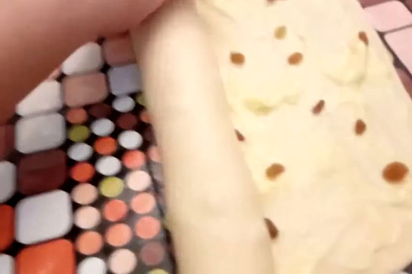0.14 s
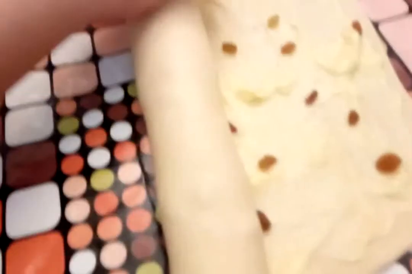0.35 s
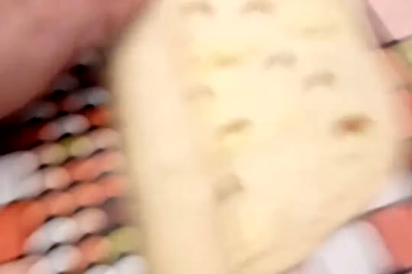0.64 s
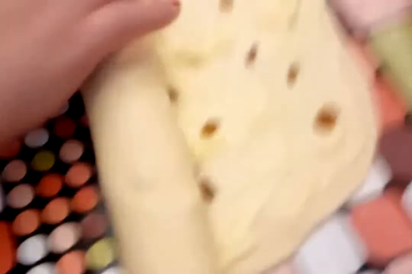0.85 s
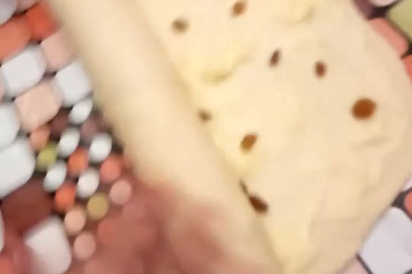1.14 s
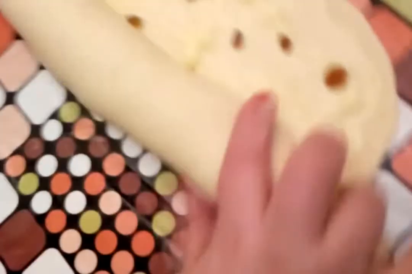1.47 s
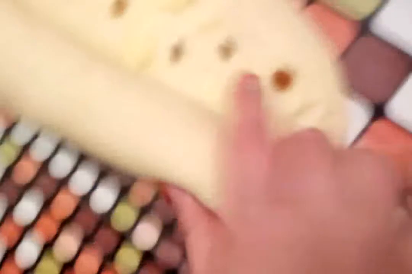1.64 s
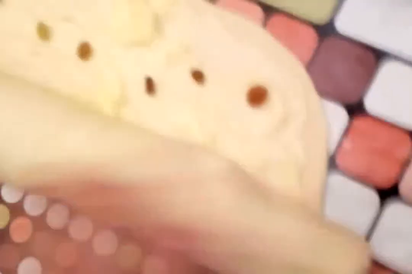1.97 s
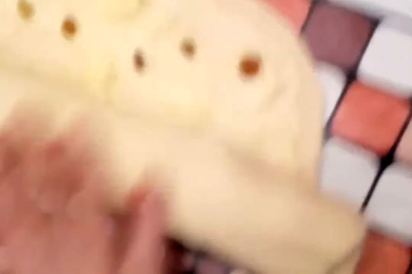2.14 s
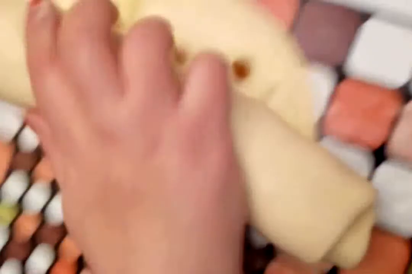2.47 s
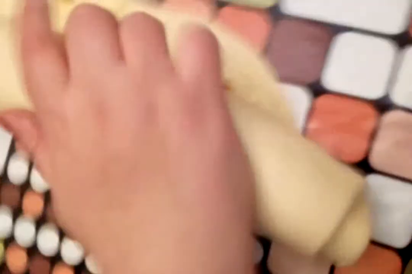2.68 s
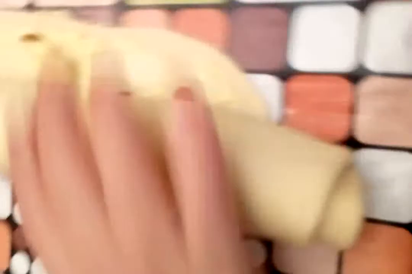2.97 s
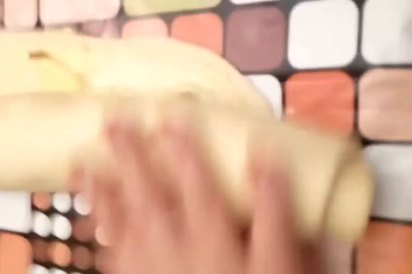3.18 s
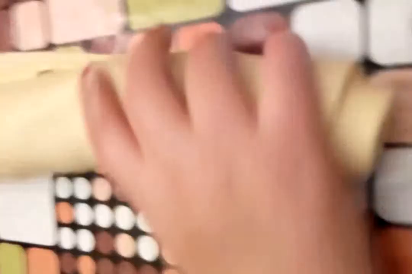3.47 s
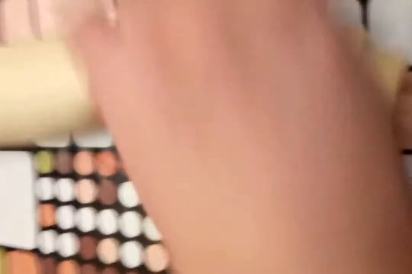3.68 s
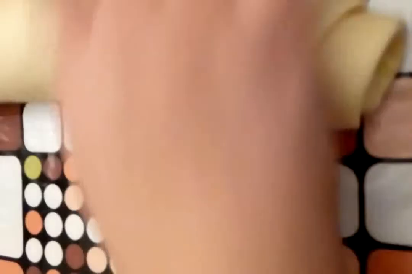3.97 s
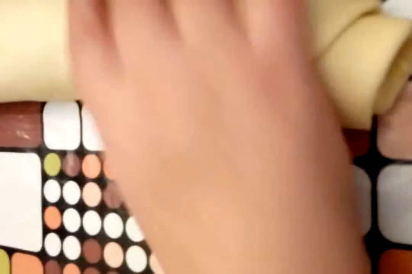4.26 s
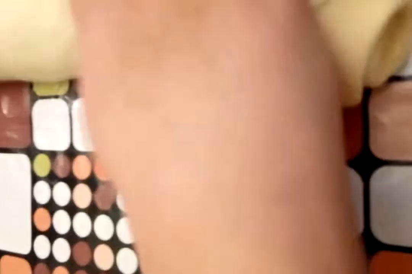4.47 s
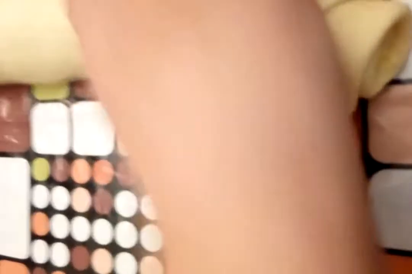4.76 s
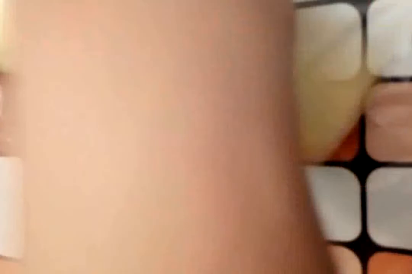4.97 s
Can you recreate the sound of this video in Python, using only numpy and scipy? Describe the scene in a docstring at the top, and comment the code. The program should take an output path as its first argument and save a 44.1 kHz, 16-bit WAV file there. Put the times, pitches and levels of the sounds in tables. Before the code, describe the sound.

Very close, dry handling of soft dough on a plastic tablecloth in a quiet kitchen. Faint thin skin hisses come first, then from about one second a run of quick firm strokes with crackly peeling, low rasps, sharp ticks and small pops. After three seconds it thins to light palm rubs, faint clicks and two tiny clinks. Centred sound, hardly any echo.

```python
"""A narrow hiss of skin on soft dough, close to the microphone, over the hush of a quiet kitchen.
Hands roll a sheet of dough into a log on a plastic tablecloth: filtered noise and grains make the hiss,
the fine crackle of dough peeling off the cloth, the rasp of squeezing, the palm's rub and the low rumble.
Tacky spots let go with ticks (snap and short ring), pats and air pockets pop (brief sine bursts),
jolts make tableware clink (decaying sines), and faint stray clicks come in later."""
import sys
import numpy as np
from scipy import signal
from scipy.io import wavfile
from scipy.ndimage import uniform_filter1d

SR = 44100
rng = np.random.default_rng(int(sys.argv[2]) if len(sys.argv) > 2 else 0)


def persist_wave(psi):
    """Save psi, clipped to +-1, as 16-bit WAV."""
    counts = np.round(np.clip(psi, -1, 1) * 32767).astype(np.int16)
    wavfile.write(sys.argv[1], SR, np.atleast_2d(counts).T)


N = 225741
TIME = np.arange(N) / SR  # s
FFT_SIZE, HOP = 512, 128  # samples
BINS = np.fft.rfftfreq(FFT_SIZE, 1 / SR)[:, None]  # Hz
FRAMES = np.arange(-(-N // HOP) + 1) * HOP / SR  # s

# In all gesture tables level_db and swell_db are relative: each sound's own trim comes on top.
# Light glides of skin over the dough; a fingertip almost whistles, a flat hand hisses broadly:
# start_s, length_s, level_db, swell_db, hiss_centre_hz, half_width_octaves
LIGHT_GLIDES = [(0,0.36,-73,2.5,4530,0.12),(.43,0.12,-63.5,-3.5,5300,1),(.83,0.082,-71,0,5900,0.46),(.925,0.086,-57.5,1,5200,.48),
                (1.05,0.64,-63.5,-4.5,4750,0.59),(1.935,0.058,-61.5,4.5,5550,0.094),(2.88,0.1,-59.5,-3,5500,0.44),(2.99,0.06,-60.5,0.5,4770,0.27),(3.08,0.16,-63.5,5.5,5300,0.5),
                (3.55,.16,-68,4.5,5080,0.29),(3.81,.03,-77,0,4780,.025),(4.16,0.065,-65.5,3,5350,0.24),(4.39,0.044,-69.5,10.5,5600,.25),(4.58,0.13,-55.5,-5.5,5430,.28),
                (4.83,0.016,-54.5,4.5,5700,0.45),(4.88,0.12,-66.5,3,6800,0.12)]
GLIDE_ATTACK_S, GLIDE_RELEASE_S = 0.066, 0.078  # every attack and release: time for 20 dB

# Firm strokes that roll the log and lift it off the cloth:
# start_s, length_s, level_db, swell_db, hiss_centre_hz, peel_rel_db, fine_crackle_rel_db
FIRM_STROKES = [(1.2,0.086,-57,0,5060,-5.5,-25),(1.42,0.039,-60.5,1,5500,-18,-7.5),(1.49,0.12,-44,-11.5,5200,-8.5,-17),(1.63,0.15,-64.5,4,5400,-1,-21),
                (1.78,0.061,-43,-2,4960,-10,-17),(1.86,0.039,-51,-4.5,4900,-4.5,-18.5),(2.02,0.11,-56.5,7.5,5000,-5.5,-23),(2.168,0.044,-47,-1,6100,-12.5,-12.5),
                (2.262,0.14,-48,-4.5,4870,-6.5,-22),(2.405,0.073,-48,-2.5,4730,-7.5,-14),(2.5,.11,-47,0,4850,-3.5,-16),
                (2.635,0.22,-45.5,-8,4470,-10,-31),(3.312,.125,-54,-2,5400,-7,-27.5)]


def amp(db):
    """Decibels to gain."""
    return 10 ** (np.asarray(db) / 20)


def unit(x):
    """Scales to rms 1."""
    return x / np.sqrt(np.mean(x ** 2) + 1e-20)


def add(mix, s, sound):
    """Mixes a sound in at time s."""
    part = mix[max(round(s * SR), 0):][:len(sound)]
    part += sound[:len(part)]


def impulse(points, size=4096):
    """Minimum-phase click whose spectrum follows the given colour."""
    hz, db = np.transpose(points)
    log_hz = np.log(abs(np.fft.fftfreq(size, 1 / SR)) + 1)
    log_gain = np.log(amp(np.interp(log_hz, np.log(hz), db)))
    spectrum = np.exp(np.conj(signal.hilbert(log_gain)))
    return np.fft.ifft(spectrum).real[:size // 2]


def colour(x, points):
    """Gives x a fixed colour, at rms 1."""
    return unit(signal.oaconvolve(x, impulse(points))[:N])


def slips(per_s, spread_db, smooth, clump_db, clump_hz):
    """Tiny stick-slip releases of random sign, in clumps, over a smooth noisy rub, at rms 1."""
    size = amp(spread_db * np.minimum(rng.exponential(1, N), 4))
    sign = rng.choice([-1, 1], N)
    grains = unit(size * sign * (rng.random(N) < per_s / SR))
    clumps = np.interp(TIME * clump_hz, np.arange(N), rng.standard_normal(N))
    rub = grains + smooth * rng.standard_normal(N)
    return unit(rub * amp(clump_db * clumps))


def gestures(rows, attack_s, release_s):
    """Each gesture rises, swells or sags, and dies away: gains, progress 0-1, further columns."""
    start, length, db, swell_db, *columns = np.transpose(rows)[:, :, None]
    progress = np.clip((FRAMES - start) / np.maximum(length, .001), 0, 1)
    before = np.maximum(start - FRAMES, 0) / attack_s
    after = np.maximum(FRAMES - start - length, 0) / release_s
    gains = amp(db + swell_db * progress - 20 * np.minimum(before + after, 10))
    return gains, progress, *columns


def together(gains, idle=0):
    """Joint gain of overlapping gestures and a steady idle level, sample by sample."""
    joint = np.sqrt(np.sum(gains ** 2, axis=0) + idle ** 2)
    return np.interp(TIME, FRAMES, joint)


def blend(gains, values):
    """A property of the contact, led by whichever gesture is loudest."""
    return np.sum(gains ** 2 * values, axis=0) / np.sum(gains ** 2, axis=0)


def sweep(x, gain, ripple_db):
    """Filters x by a moving gain; shifting fingers add drifting peaks and notches. Rms 1."""
    overlap = FFT_SIZE - HOP
    z = signal.stft(x, SR, nperseg=FFT_SIZE, noverlap=overlap)[2]
    ripple = uniform_filter1d(rng.standard_normal(z.shape), size=2, axis=0)  # across bins
    ripple = unit(uniform_filter1d(ripple, size=22, axis=1))  # across frames
    gain = gain * amp(ripple_db * ripple)
    gain = gain / np.sqrt(np.mean(gain ** 2, axis=0))
    return unit(signal.istft(z * gain, SR, nperseg=FFT_SIZE, noverlap=overlap)[1][:N])


def hiss(gains, hz, width_oct, top_hz=6900):
    """Skin ridges catch and slip, hissing in a narrow band, dulled at the top by the microphone."""
    half_width = np.maximum(blend(gains, width_oct), .02)
    away = np.log2((BINS + 1) / blend(gains, hz)) / half_width
    microphone_drop = np.sqrt(1 + (BINS / top_hz) ** 36)
    band = (1 + away ** 2) ** -1.5 / microphone_drop
    rub = slips(per_s=3000, spread_db=3.5, smooth=0.81, clump_db=2.05, clump_hz=170.4)
    return together(gains) * sweep(rub, band, ripple_db=4.0)


def sliding(trim_db=-1.5):
    """Skin hisses in light glides and, under a flat hand, in firm strokes."""
    light, _, light_hz, width_oct = gestures(LIGHT_GLIDES, GLIDE_ATTACK_S, GLIDE_RELEASE_S)
    firm, _, firm_hz, _, _ = gestures(FIRM_STROKES, attack_s=0.051, release_s=0.048)
    firm_width_oct = 0.55
    return amp(trim_db) * (hiss(light, light_hz, width_oct) + hiss(firm, firm_hz, firm_width_oct))


def kitchen_hush(level_db=-74):
    """Steady coloured noise of the quiet kitchen."""
    # Colour of the room's hush: freq_hz, relative_db
    hush_colour = [(15, -61), (25, -28), (71, -0.5), (140, -6), (523, -7), (762, -9.5), (826, -11),
                   (4260, -20), (5430, -21), (15500, -29)]
    return amp(level_db) * colour(rng.standard_normal(N), hush_colour)


def peeling(glide_fine_db=-27, idle_db=-86, trim_db=5.0):
    """Sticky threads break as dough leaves the cloth; strokes add finer crackle, glides only a trace."""
    # Colour of the peeling sheet: freq_hz, relative_db
    sheet_colour = [(200, -31), (550, -16), (1000, -13), (2000, -1.5), (3100, 0.5), (4200, 0), (5800, 3),
                    (6800, -31.5), (8000, -20), (16000, -48)]
    # Colour of the finer crackle: freq_hz, relative_db
    fine_colour = [(3000,-25.5),(5500,-16.5),(6700,13),(8200,8.5),(11000,6.5),(13000,5),(15000,0),(16000,-5)]
    # peeling starts more abruptly than the hiss and dies away about as fast
    firm, _, _, peel_db, fine_db = gestures(FIRM_STROKES, attack_s=0.027, release_s=0.047)
    light = gestures(LIGHT_GLIDES, GLIDE_ATTACK_S, GLIDE_RELEASE_S)[0]
    threads = slips(per_s=4000, spread_db=0.0, smooth=.9, clump_db=2.2, clump_hz=175)
    sheet_gain = together(firm * amp(peel_db), amp(idle_db))
    fine_gain = together(np.vstack([firm * amp(fine_db), light * amp(glide_fine_db)]))
    sheet = sheet_gain * colour(threads, sheet_colour)
    fine = fine_gain * colour(threads, fine_colour)
    crackle = amp(trim_db) * (sheet + fine)
    return np.std(crackle) * sweep(crackle, 1, ripple_db=3.0)  # sweep resets the level


def squeezing(top_hz=2200, fall_oct=0.74, idle_db=-82, trim_db=-1.1):
    """Coarser slips rasp in the gap under the fingers, whose pitch falls as the dough spreads."""
    # Dough squeezed along under the fingers: start_s, length_s, level_db, swell_db, open_gap_hz
    squeezes = [(1.2,0.1,-65.5,2.5,850),(1.42,0.12,-46.5,-11.5,930),(1.645,0.13,-51,5.5,1020),(2.03,0.14,-61,6,760),
                (2.255,0.1,-53.5,-0.5,844),(2.37,0.071,-51.5,10.5,790),(2.48,0.092,-57,-1.5,1010),(2.59,0.0067,-38.5,-1.5,1030),
                (2.63,0.321,-63,-6,1120),(3.14,0.015,-58,0.5,1270),(3.33,.1,-67.5,6.5,1000),(3.605,0.086,-73,2.5,1220)]
    gains, progress, open_hz = gestures(squeezes, attack_s=0.027, release_s=0.021)
    gap_hz = open_hz * 2 ** (-fall_oct * progress ** 2)  # sinks slowly at first
    ratio = BINS / blend(gains, gap_hz)
    resonance = abs(ratio ** 2 / (1 - ratio ** 2 + .95j * ratio)) ** 2
    gap = resonance / np.sqrt(1 + (BINS / top_hz) ** 9)
    rub = slips(per_s=1800, spread_db=0.5, smooth=0.58, clump_db=2.5, clump_hz=159)
    return together(gains, amp(idle_db)) * amp(trim_db) * sweep(rub, gap, ripple_db=1.0)


def rolling(idle_db=-82.5, trim_db=3.5):
    """The soft log's weight shifts and rumbles on the table, never quite at rest."""
    # Shifts of the log's weight: start_s, length_s, level_db, swell_db
    shifts = [(.4,0.044,-63,-7),(.92,0.1,-79,-2),(1.21,0.25,-68.5,-2.5),(1.48,0.033,-56.5,-6),(1.96,0.056,-81,9.5),(2.19,0.22,-66.5,-6.5),
              (3.31,0.038,-77,3.5),(3.65,0.033,-64,-7.5),(4.2,0.16,-80.5,1),(4.67,.19,-73,2.5),(5,0.033,-67,2.5)]
    # Colour of the table's rumble: freq_hz, relative_db
    table_colour = [(20, -16), (45, -10), (70, -11.5), (110, 4.5), (170, 0.5), (300, -3.5), (450, -7),
                    (800, -33.5), (2000, -39.5)]
    gains, _ = gestures(shifts, attack_s=0.047, release_s=0.086)
    bumps = slips(per_s=150, spread_db=3.5, smooth=1.2, clump_db=1.5, clump_hz=38.4)
    return together(gains, amp(idle_db)) * amp(trim_db) * colour(bumps, table_colour)


def ticks(swell_s=.00016, top_hz=7000):
    """Each release is a broad snap and a very short ring of the plastic."""
    # Tacky spots letting go: start_s, ring_peak_db, ring_hz, snap_peak_db
    releases = [(0.388,-49,1810,-70),(0.4161,-30,5360,-42.5),(1.1919,-40,6200,-30.5),(1.2802,-33.5,5200,-50),
                (1.3955,-60,5400,-47),(1.4331,-18.5,5430,-17.5),(1.4354,-21.5,4800,-33),(1.481,-20.5,5740,-41),(1.967,-41,5700,-67),
                (2.21,-34,4770,-27),(2.2253,-18.5,3870,-16),(2.2272,-23.5,5960,-28),
                (2.5566,-46,6000,-26),(2.597,-27,5350,-29),(2.6018,-28,5600,-36),(2.802,-40,5100,-41),
                (2.8405,-22.5,5940,-34.5),(2.8958,-33,4950,-39.5),(3.1386,-34.5,5600,-43.5),
                (3.4197,-38.5,5100,-59),(3.6054,-49,1330,-52),(3.627,-51,1240,-65),(3.756,-53.5,1770,-64),(3.795,-53.5,1330,-62),(4.2781,-46.5,5430,-53),(4.3762,-46.5,5530,-67),
                (4.566,-41,5600,-52),(4.6051,-33.5,5570,-64),(4.6237,-34,5500,-69),(4.657,-32,5750,-64),
                (4.695,-43,5340,-51),(4.799,-63,6300,-52)]
    # Colour of the broad snap: freq_hz, relative_db
    snap_colour = [(100,-45),(500,-23),(1000,4.5),(2500,1),(4000,3.5),(6000,-5),(7800,-5.5),(12000,-10.5),(16000,-11)]
    out, snap = np.zeros(N), impulse(snap_colour)
    snap = snap / abs(snap).max()
    t = np.arange(len(snap)) / SR
    envelope = t ** 2 * np.exp(-t / swell_s)
    # rings dulled above 7 kHz by the microphone
    microphone = signal.butter(8, top_hz, fs=SR, output="sos")
    for s, ring_db, hz, snap_db in releases:
        ring = signal.sosfilt(microphone, np.sin(2 * np.pi * hz * t) * envelope)
        add(out, s, amp(ring_db) * ring / abs(ring).max() + amp(snap_db) * snap)
    return out


def pops():
    """Dough does not ring: each pat or air pocket is one or more brief sine bursts."""
    # Bursts of soft pats and air pockets: centre_s, peak_db, pitch_hz, half_length_ms (Gaussian sigma)
    bursts = [(.392, -33, 195, 1.8), (0.4172, -44.5, 260, 0.92), (0.702, -55, 225, 1.6),
              (0.768, -53, 181, 1.7), (1.192, -36.5, 1110, 0.26), (1.2803, -36, 480, 0.23),
              (1.4815, -12.5, 2030, 0.1), (1.482, -17, 605, 0.4), (1.4847, -40, 138, 3.4),
              (2.2107, -42, 450, 0.42), (2.2274, -18, 920, 0.6), (2.4441, -39, 590, 0.87),
              (2.598, -32, 980, 0.77), (2.8033, -39, 1940, 0.48), (3.1394, -36.5, 1780, 0.65),
              (3.14, -36.5, 1294, 1), (3.6556, -66, 159, 1.6), (3.691, -62, 330, 9.5),
              (4.1903, -32.5, 484, 0.73)]
    out, t = np.zeros(N), np.arange(-SR // 40, SR // 40) / SR
    for s, db, hz, half_ms in bursts:
        push = np.sin(2 * np.pi * hz * t) * np.exp(-.5 * (1000 * t / half_ms) ** 2)
        add(out, s + t[0], -amp(db) * push / abs(push).max())
    return out


def cupping(trim_db=-0.5):
    """The cupped palm's rub is coloured by the hollow between hand and log."""
    # The palm rubs over the log: start_s, length_s, level_db, swell_db
    rubs = [(2.892,0.01,-53,-3.5),(3.139,0.01,-44,-6.5),(3.55,0.14,-84,-5),(4.204,0.02,-63,-3),(4.58,0.095,-63,-4),(4.692,0.011,-49.5,-7.5),
            (4.81,0.071,-63.5,6),(4.9,.1,-71.5,10),(5.01,0.041,-61.5,14),(5.06,0.07,-53,-9)]
    # Resonances of the hollow under the palm: freq_hz, width_hz, relative_db
    hollow = [(814,220,-11),(1800,1050,-15),(2320,170,-4.5),(2750,760,-5),(3760,160,-9),(4130,280,-6),(4920,390,-3),(5410,260,2.5),(5950,250,-3),(7160,300,-26)]
    gains, _ = gestures(rubs, attack_s=0.0073, release_s=0.052)
    power = 0
    for hz, width_hz, db in hollow:
        power = power + (amp(db) / (1 + (2 * (BINS - hz) / width_hz) ** 2)) ** 2
    rub = slips(per_s=2100, spread_db=0.5, smooth=0.61, clump_db=2.6, clump_hz=106.0)
    return together(gains) * amp(trim_db) * sweep(rub, np.sqrt(power), ripple_db=4.0)


def clinks(attack_s=0.002):
    """A jolt rattles loose tableware, whose decaying modes ring on for a moment."""
    # Presses that jolt the table: start_s, level_db
    jolts = [(3.139, -47.5), (4.2039, -45.5)]
    # Ringing of something hard on the table: mode_hz, level_rel_jolt_db, t60_s
    tableware = [(1730, -24.5, 0.5), (2150, -32, 0.53), (3850, -17.5, 0.18), (4220, -23, 0.16),
                 (4750, -2.5, 0.087), (5430, 1, 0.051)]
    out, t = np.zeros(N), TIME[:SR // 2]
    for s, db in jolts:
        ringing = np.zeros(len(t))
        for hz, mode_db, t60 in tableware:
            phase = rng.random()  # cycles
            ringing += amp(mode_db - 60 * t / t60) * np.sin(2 * np.pi * (hz * t + phase))
        add(out, s, amp(db) * ringing * np.minimum(t / attack_s, 1))
    return out


def strays(per_s=24, from_s=3.2, least_db=-66, spread_db=4.5):
    """Once the whole hand rests on the log, tacky skin lets go here and there with faint clicks."""
    # Colour of a stray click: freq_hz, relative_db
    click_colour = [(200, -3), (700, 7), (1400, -1), (2500, -23), (3600, -10), (5400, 17), (6800, 4),
                    (8500, -24), (16000, -38)]
    size = amp(least_db + spread_db * np.minimum(rng.exponential(1, N), 3))
    clicks = size * (rng.random(N) < per_s / SR) * (TIME > from_s)
    click = impulse(click_colour)
    return signal.oaconvolve(clicks, click / abs(click).max())[:N]


def room(x, t60=0.11, wet_db=-21):
    """Faint, short reflections from the kitchen walls: a sparse, decaying noise tail."""
    t = TIME[:SR // 2]
    echoes = rng.standard_normal(len(t)) * (rng.random(len(t)) < .06)
    tail = echoes * amp(-60 * t / t60) * (t > .003)  # nothing in the first 3 ms
    return x + amp(wet_db) * signal.oaconvolve(x, tail / np.linalg.norm(tail))[:N]


def scene():
    """All the handwork lies straight ahead, over the hush of the room; both channels are alike."""
    rubbing = sliding() + peeling() + squeezing() + rolling() + cupping()
    events = ticks() + pops() + clinks() + strays()
    mix = room(rubbing + events) + kitchen_hush()
    return np.array([mix, mix])


def record(dry, edge_hz=15750):
    """The recorder's band limit, a steep low-pass."""
    lowpass = signal.firwin(511, edge_hz, window=("kaiser", 9), fs=SR)
    return signal.oaconvolve(dry, lowpass[None], "same")


dry = scene()
out = record(dry)
persist_wave(out)
```